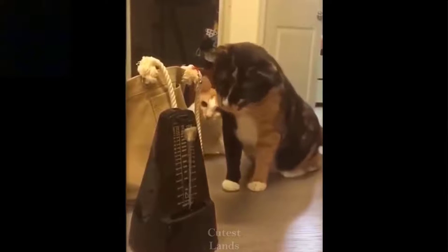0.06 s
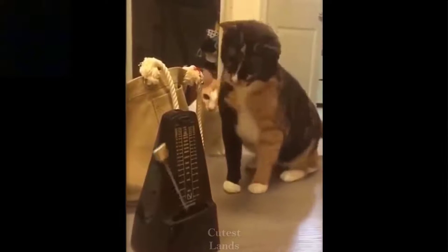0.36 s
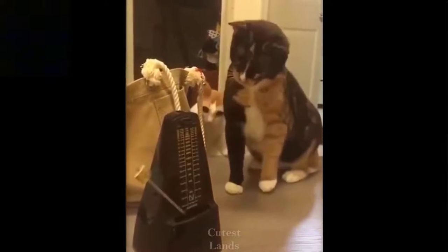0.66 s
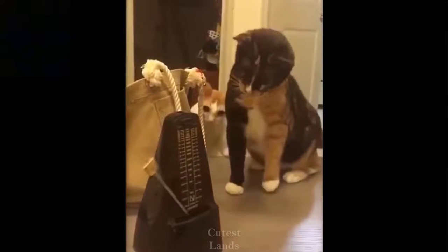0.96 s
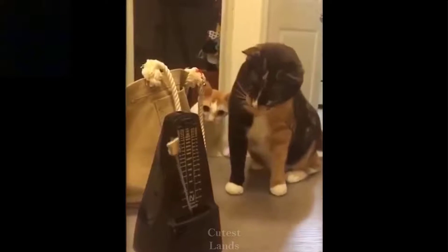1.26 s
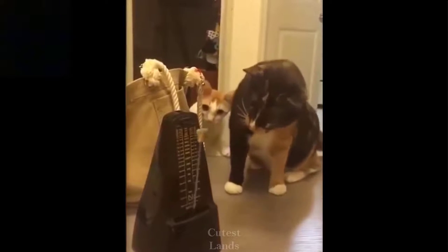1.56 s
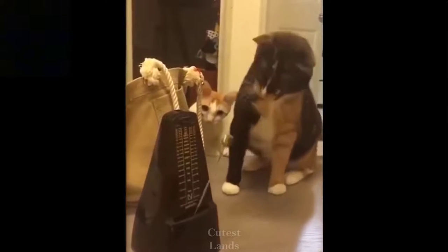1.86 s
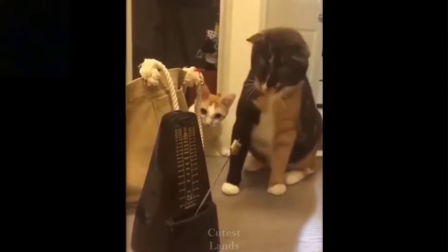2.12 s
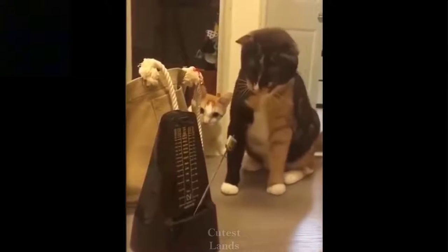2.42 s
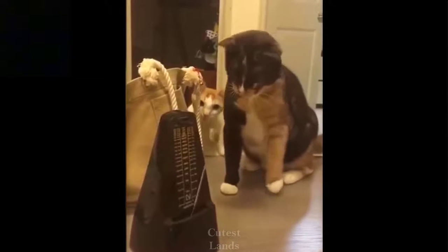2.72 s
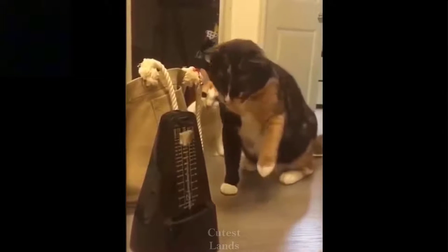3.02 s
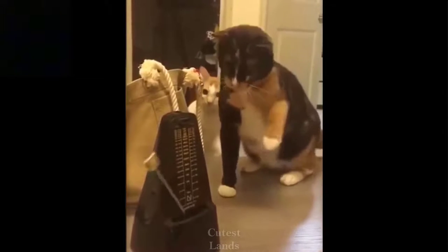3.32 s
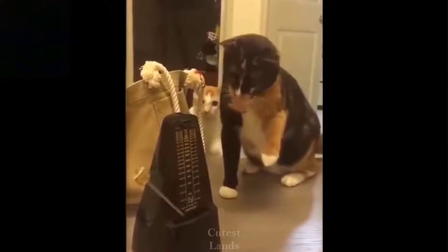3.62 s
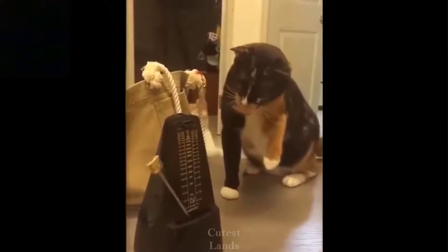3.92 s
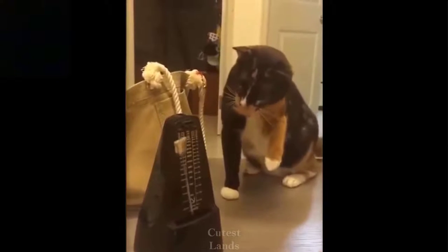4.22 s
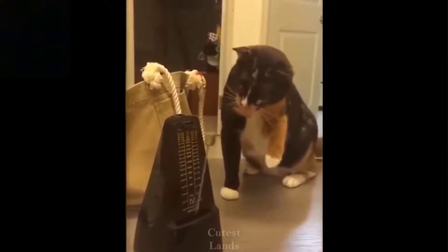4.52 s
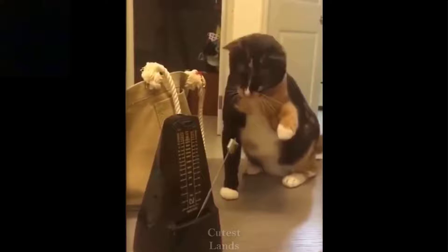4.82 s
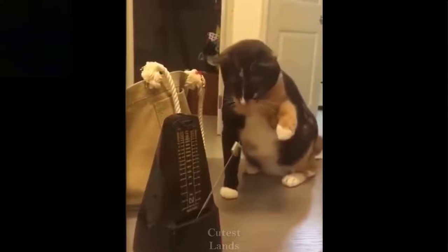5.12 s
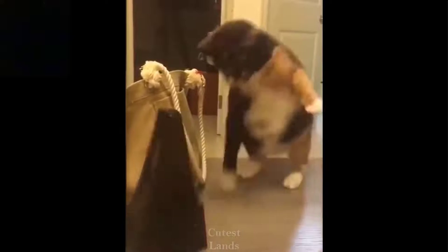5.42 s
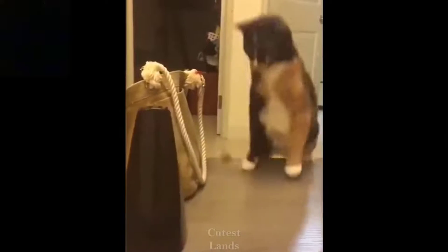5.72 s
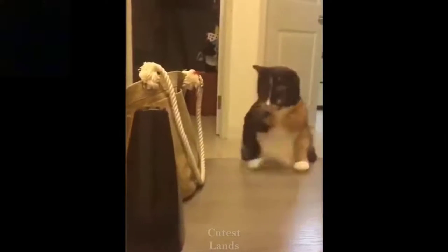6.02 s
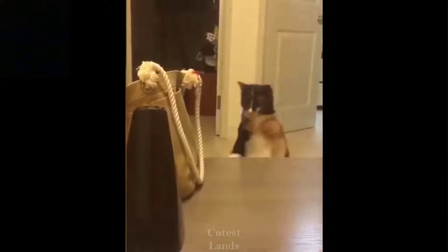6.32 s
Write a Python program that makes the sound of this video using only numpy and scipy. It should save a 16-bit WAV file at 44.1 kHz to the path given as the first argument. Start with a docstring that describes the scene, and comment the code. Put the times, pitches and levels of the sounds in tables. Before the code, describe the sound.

A low, steady ventilation hum with a soft rush of air fills a room throughout. Close by on a table, a wind-up metronome ticks slowly and evenly at about 0.5, 2.0, 3.4 and 4.9 seconds. Each beat is a dry plastic clack with a faint steel ring and a short room reverberation. Two very faint scuffs come near 0.8 and 1.4 seconds. At 5.6 seconds a cat swats the rod, making a sharp metallic clang. The case immediately scrapes and rocks, thumping the table top rapidly and rattling its loose parts until about 5.8 seconds. Another tick sounds at 5.9 seconds, followed by a second short scrape and cluster of thumps around 6.0 seconds, then a lighter scrape and rattle near 6.2. One last firm tick lands at 6.3 seconds, less metallic now that the case has turned away.

```python
"""On a table in a room humming with ventilation, a wind-up metronome ticks slowly, close by.
Each beat of the escapement is an impact that excites the damped modes of the plastic case and steel works.
A cat swats the rod: the case rocks, thumping the table top and rattling its loose parts, and scrapes round
by stick-slip friction. The last two beats sound from its back, which shields the steel.
Early reflections and a short diffuse reverberation follow the impacts."""
import sys
import numpy as np
from scipy import signal
from scipy.fft import rfft, irfft
from scipy.io import wavfile
from scipy.ndimage import uniform_filter1d, minimum_filter1d

SR = 44100
rng = np.random.default_rng(int(sys.argv[2]) if len(sys.argv) > 2 else 0)


def file_out(sig):
    """Save sig as 16-bit WAV at sys.argv[1]."""
    # one column per channel
    cols = np.atleast_2d(sig).T
    # limit, then scale
    lim = np.clip(cols, -1, 1)
    pcm = np.round(lim * 32767).astype(np.int16)
    wavfile.write(sys.argv[1], SR, pcm)


N = 289296
RING_T = np.arange(SR // 3) / SR  # time axis of one impact, t/s

# rush of the ventilation: (f/Hz, relative spectral level/dB)
AIR_SPECTRUM = [(15, -30.5), (50, -9), (88, -0.5), (108, -11.5), (160, -14), (215, -8), (335, -11),
                (390, -20), (560, -17.5), (760, -27), (1060, -30.5), (1270, -37.5), (1550, -39),
                (1950, -39.5), (2300, -43.5), (2600, -42), (3000, -45.5), (4000, -48.5), (5000, -50),
                (9500, -60.5)]
# hum bands of the ventilation: (f/Hz, width/Hz, rms level/dB)
HUM_BANDS = [(73.6, 15, -46.5), (132.7, 11, -47), (192.3, 9, -39), (257.6, 17, -47.5)]
# first reflections from the table and walls: (delay/s, level/dB)
EARLY_ECHOES = [(.0054, -19.5), (.0102, -29), (.0145, -21), (.017, -13.5), (.0305, -27.5)]
# reverberation time of the room: (f/Hz, T60/s)
REVERB_TIMES = [(200, 0.49), (660, 0.27), (2200, 0.4), (4600, 0.33), (9000, 0.29)]
# colour of the reverberation: (f/Hz, level/dB)
REVERB_SPECTRUM = [(200, 3), (660, -2), (1200, 3), (2500, -4), (4600, -2.5), (8500, 1.5)]
# response of the small microphone: (f/Hz, gain/dB)
MIC_RESPONSE = [(1150, -1), (1480, -1.5), (1900, 3.5), (4400, -0.5), (5000, -4), (5800, 0)]
# faint scuffs between the beats: (t/s, level/dB)
FAINT_SCUFFS = [(0.76, -52.5), (1.42, -59.5)]
# shoves that slide base and paws over the table: (t/s, rise/s, length/s, level/dB, tilt/(dB/octave))
SLIDES = [(5.561, 0.014, 0.23, -29.5, -1), (5.867, .009, 0.11, -38.5, 0), (5.958, .045, 0.079, -33.5, -1.5),
          (6.188, 0.012, 0.11, -36, -5)]
# loose plastic rattling and rubbing in the hollow case: (f/Hz, relative spectral level/dB)
RATTLE_SPECTRUM = [(150, -10), (400, 3.5), (780, 6.5), (1050, -1.5), (1280, -0.5), (1480, -9.5), (1800, -2),
                   (2030, -0.5), (2300, -1.5), (2600, -3.5), (3000, -5.5), (3300, 2), (3750, -16.5),
                   (4100, 0.5), (4400, -9), (4700, -3), (5000, -7), (6500, -13), (8400, -15), (10000, -52)]
# modes of the table top: (f/Hz, T60/s, level/dB)
TABLE_MODES = [(189, 0.34, -4), (245.3, 0.16, 3), (267, 0.13, -5), (327.6, 0.11, 0.5), (359.8, 0.11, 4),
               (416.8, 0.063, 6), (459.4, 0.11, -2), (565, 0.042, 4.5)]
# the base lands on one edge after another:
# (t/s, thump level/dB, edge f/Hz, rattle level/dB, tilt/(dB/octave), clink f/Hz, clink level/dB)
LANDINGS = [(5.6362, -7, 424, -15.5, 1.5, 1970, -12), (5.649, -10.5, 255, -22.5, 1.5, 2000, -19),
            (5.659, -11, 204, -36.5, 5, 2150, -27.5), (5.6659, -25.5, 330, -20.5, -1, 2450, -22),
            (5.689, -5, 287, -18, 1.5, 1880, -29), (5.7041, -16.5, 280, -16.5, -1.5, 1920, -20.5),
            (5.724, -12.5, 363, -21, 0, 2260, -18), (5.7556, -11, 338, -33, -5, 2060, -23),
            (5.78, -18, 349, -30, -7, 2100, -36), (5.7892, -16, 360, -29, 1, 2280, -26),
            (5.877, -39, 330, -19.5, 0.5, 1850, -26.5), (5.964, -27, 398, -28, 0.5, 2680, -24),
            (5.9881, -24.5, 400, -31, -9, 2420, -26), (5.998, -22.5, 336, -24.5, -2, 2200, -29),
            (6.005, -8, 355, -15.5, 0, 2700, -25), (6.026, -12, 440, -23, -1.5, 2030, -26),
            (6.045, -23, 235, -37, 5, 2120, -37), (6.2055, -47, 455, -30, -7.5, 1960, -35),
            (6.2365, -34, 484, -25.5, -5, 1960, -29.5), (6.2841, -26.5, 287, -45, 2, 1850, -32)]
# the swatted rod chatters against the case: (t/s, rod level/dB, case level/dB, rattle level/dB)
ROD_STRIKES = [(5.5695, -35, -7, -14), (5.5763, -4.5, -20, -18), (5.607, -19, -30, -19.5)]
# broad modes of the plastic case: (f/Hz, T60/s, front level/dB, back level/dB)
CASE_MODES = [(321.2, 0.14, -18.5, -22.5), (675, 0.019, 1.5, -6.5), (807, 0.041, -47, -8),
              (1049, 0.019, -13, -13), (1220, 0.024, -24, -23), (1620, .012, -19.5, -24),
              (1763, 0.032, -13.5, -18), (2046, 0.021, -13, -18), (2480, 0.0096, -1.5, -10),
              (2744, 0.011, -36.5, -11.5), (3227, 0.017, -9.5, -15.5), (3477, 0.021, -13, -32),
              (3956, 0.012, -19, -16), (4690, 0.0085, -10, -27), (5460, 0.0065, -22, -17),
              (7620, 0.005, -18.5, -36), (8470, 0.012, -26.5, -39.5)]
# modes of the steel rod and clockwork: (f/Hz, T60/s, beat level/dB, swatted level/dB, shaken level/dB)
STEEL_MODES = [(1300, .09, -39, -19, -20), (1764, .2, -27, -40.5, -17), (1980, .21, -29, -29, -10),
               (2057, .12, -28, -27, -13), (2126, .12, -29, -28, -16), (2172, .09, -30.5, -18.5, -11),
               (2428, .13, -31, -32, -17), (2471, .14, -23, -23, -15), (2610, .16, -25, -32, -21),
               (2805, .13, -28.5, -30, -17), (3160, .12, -30, -30, -18), (3298, .12, -27.5, -7.5, -16),
               (3436, .11, -25, -12.5, -21), (3480, .08, -23, -30, -22), (3975, .03, -33, -9, -18),
               (4100, .05, -24, -13, -13), (4570, .044, -31, -7, -18), (4738, .11, -27, -11, -17),
               (5360, .06, -38, -19, -25), (6735, .12, -47, -34, -30), (7610, .04, -39.5, -19, -29),
               (8385, .06, -37.5, -21, -27)]
# the crowd of small modes in the case: (f/Hz, relative spectral level/dB)
CLACK_SPECTRUM = [(200, -10), (600, -1), (950, 7), (1400, 4), (2300, -1), (3300, -20), (3800, -1.5),
                  (6000, -4.5), (8300, -7), (8900, -10), (10000, -40)]
# a beat as radiated into the room, averaged over all directions: (f/Hz, relative spectral level/dB)
RADIATED_SPECTRUM = [(200, -8), (420, -18), (650, -7), (950, 6.5), (1400, -9.5), (1950, -5.5), (2550, 2),
                     (3350, -4.5), (3700, -2.5), (4600, -5), (5600, -13), (8100, -26), (10000, -28)]
# escapement beats: (t/s, level/dB, tilt/(dB/octave), midrange bite/dB, case turned away 0-1)
BEATS = [(0.5054, -2, 0, 1.5, 0.1), (2.006, 0, 1.5, -3.5, 0.11), (3.4198, 0, 1, 0.5, 0.27),
         (4.9008, 0, 1, -0.5, 0.13), (5.8663, -3.5, -0.5, -2, 0.92), (6.3328, 1, -0.5, 2, 1)]


def amp(db):
    """Amplitude ratio: a factor of ten for every 20 dB."""
    return 10 ** (np.asarray(db) / 20)


def unit_rms(x):
    """Normalisation to unit mean power."""
    return x / np.sqrt(np.mean(x ** 2) + 1e-20)


def curve_at(points, hz):
    """Interpolation on a logarithmic frequency axis."""
    f, value = np.transpose(points)
    return np.interp(np.log(hz + 1), np.log(f + 1), value)


def add(mix, start_s, sound):
    """Superposition: a sound adds linearly to the mix from its onset."""
    part = mix[round(start_s * SR):][:len(sound)]
    part += sound[:len(part)]


def coloured(x, spectrum):
    """Linear filtering by a spectral envelope, scaled to unit rms."""
    gain = amp(curve_at(spectrum, np.fft.rfftfreq(len(x), 1 / SR)))
    return unit_rms(irfft(rfft(x) * gain, len(x)))


def tilted(spectrum, tilt):
    """Spectral slope: a tilt in dB per octave brightens or dulls a sound."""
    return [(f, level + tilt * np.log2(f)) for f, level in spectrum]


def blow_colour(hz, tilt, bite_db, centre_hz=2040, width_octaves=1):
    """Excitation spectrum of one blow, in dB: a slope and a midrange hump."""
    octaves = np.log2(hz / centre_hz)
    return tilt * octaves + bite_db * np.exp(-(octaves / width_octaves) ** 2)


def ring(hz, t60, db, rise_cycles, lag):
    """Damped modes with dispersion: bending waves bring the treble first (lag: travel time/s at 1 kHz)."""
    hz, t60, db = hz[:, None], t60[:, None], db[:, None]
    delay = lag * np.sqrt(1000 / hz)
    t = np.maximum(RING_T - delay + delay.min(), 0)
    envelope = amp(db - 60 * t / t60) * (1 - np.exp(-t * hz / rise_cycles))
    return (envelope * np.sin(2 * np.pi * hz * t)).sum(0)


def burst(spectrum, t60, rise_s=0.00054):
    """Modal overlap: countless small modes merge into a dying noise with a smooth spectrum."""
    envelope = amp(-60 * RING_T / t60) * (1 - np.exp(-RING_T / rise_s))
    phase = np.angle(rfft(rng.standard_normal(len(RING_T)) * envelope))
    flat = irfft(np.exp(1j * phase), len(RING_T))  # the phase alone carries the decay
    smooth = coloured(flat, spectrum) * np.sqrt(np.mean(envelope ** 2))
    return smooth * signal.windows.tukey(len(RING_T), .004) * (1 - RING_T / RING_T[-1])


def diffused(response):
    """Spectral smoothing: narrow peaks that would ring are levelled, and the broad colour stays."""
    z = rfft(response, 2 * len(response))
    power = abs(z) ** 2
    z = z * np.sqrt(uniform_filter1d(power, size=400) / uniform_filter1d(power, size=30))
    return irfft(z)[:len(response)]


def ventilation(rush_db=-37):
    """Broadband flow noise, with narrow noise bands whose random beating makes the hum waver."""
    hz = np.fft.rfftfreq(N, 1 / SR)
    out = amp(rush_db) * coloured(rng.standard_normal(N), AIR_SPECTRUM)
    for centre, width, db in HUM_BANDS:
        band = rfft(rng.standard_normal(N)) / (1 + 2 * ((hz - centre) / width) ** 2)
        out += amp(db) * unit_rms(irfft(band, N))
    return out


def reverberation(x, build_up_s=0.0058):
    """A diffuse field builds up, then decays exponentially at its own rate in each band."""
    size = SR // 2
    hz, t, z = signal.stft(rng.choice([-1., 1.], size), SR, nperseg=256)
    t60 = curve_at(REVERB_TIMES, hz)[:, None]
    unit_energy = np.sqrt(2 * np.log(1000) / (t60 * SR))
    z = z * unit_energy * amp(curve_at(REVERB_SPECTRUM, hz)[:, None] - 60 * t / t60)
    response = signal.istft(z, SR, nperseg=256)[1][:size]
    onset = np.clip(np.arange(size) / SR / build_up_s, 0, 1) ** .5
    return signal.fftconvolve(x, onset * diffused(onset * response))[:N]


def reflections(x):
    """Specular reflection: the table and walls return delayed, weaker copies."""
    out = np.zeros(N)
    for delay, db in EARLY_ECHOES:
        add(out, delay, amp(db) * x)
    return out


def shove(rise, length, sag_db_per_s=-12.5, stop_db_per_s=-200):
    """Frictional braking: the envelope of a slide that grips, slows down, then stops."""
    t = np.arange(SR) / SR
    return np.minimum(t / rise, 1) * amp(sag_db_per_s * t + stop_db_per_s * np.maximum(t - length, 0))


def sliding(slips_per_s=1400, spread_db=1.0):
    """Stick-slip friction: a dense train of tiny, uneven slips under each shove, and two light scuffs."""
    out = np.zeros(N)
    for s, rise, length, db, tilt in SLIDES:
        slips = (rng.random(SR) < slips_per_s / SR) * rng.choice([-1, 1], SR)
        sizes = amp(spread_db * np.minimum(rng.exponential(1, SR), 4))
        scrape = coloured(slips * sizes, tilted(RATTLE_SPECTRUM, tilt))
        add(out, s, amp(db) * shove(rise, length) * scrape)
    for s, db in FAINT_SCUFFS:
        add(out, s, amp(db) * burst([(500, -12), (2500, 5), (7000, 3.0), (10000, -8)], t60=0.13))
    return out


def rocking(width_octaves=0.36, clockwork_db=-12, uneven_db=2, thump_lag_s=0.0014, clink_t60=0.03):
    """Impact excitation: each landing drives the table modes near its pitch and shakes case and works."""
    rattles, rings = np.zeros((2, N))
    hz, t60, db = np.transpose(TABLE_MODES)
    steel_hz, steel_t60, _, _, shaken = np.transpose(STEEL_MODES)
    for s, thump_db, edge_hz, rattle_db, tilt, clink_hz, clink_db in LANDINGS:
        levels = thump_db + db - 6 * (np.log2(hz / edge_hz) / width_octaves) ** 2
        thump = ring(hz, t60, levels, rise_cycles=1.0, lag=0.00067)
        add(rings, s + thump_lag_s, thump)  # the table top gives way just after the click
        jangle_db = rattle_db + clockwork_db + shaken + blow_colour(steel_hz, tilt, 0)
        jangle_db += uneven_db * rng.standard_normal(len(shaken))
        add(rings, s, ring(steel_hz, steel_t60, jangle_db, rise_cycles=1.5, lag=0.00088))
        loose_part = np.transpose([(clink_hz, clink_t60, clink_db)])
        add(rings, s, ring(*loose_part, rise_cycles=2.6, lag=0))
        add(rattles, s, amp(rattle_db) * burst(tilted(RATTLE_SPECTRUM, tilt), t60=0.041))
    return rattles, rings


def swat():
    """Collision: the paw drives the rod into the case, and each rings in its own modes."""
    case, steel = np.zeros((2, N))
    steel_hz, steel_t60, _, swatted, _ = np.transpose(STEEL_MODES)
    clang = ring(steel_hz, steel_t60, swatted, rise_cycles=1.6, lag=0.00084)
    hz, t60, _, back = np.transpose(CASE_MODES)
    knock = ring(hz, t60, back, rise_cycles=1.0, lag=0.0013)
    for s, rod_db, case_db, rattle_db in ROD_STRIKES:
        add(case, s, amp(case_db) * knock + amp(rattle_db) * burst(RATTLE_SPECTRUM, t60=0.077))
        add(steel, s, amp(rod_db) * clang)
    return case, steel


def metronome(clack_db=-22, gears_db=-25, shield_db=-9, uneven_db=1,
              radiated_db=-13, turned_db=-2.5, turned_tilt=-0.3):
    """Directivity: each beat rings case and steel, and the back favours other modes than the open front."""
    case, steel, radiated = np.zeros((3, N))
    hz, t60, front, back = np.transpose(CASE_MODES)
    steel_hz, steel_t60, on_beat, _, _ = np.transpose(STEEL_MODES)
    clack = amp(clack_db) * burst(CLACK_SPECTRUM, t60=0.022)  # the case answers every beat alike
    for s, db, tilt, bite_db, turned in BEATS:
        levels = (1 - turned) * front + turned * back + blow_colour(hz, tilt, bite_db)
        knock = ring(hz, t60, levels, rise_cycles=1.6, lag=0.00154)
        gears = amp(gears_db + 2 * tilt) * burst(CLACK_SPECTRUM, t60=0.07)  # loose gears shake anew
        add(case, s, amp(db) * (knock + clack + gears))
        ping_db = on_beat + turned * shield_db + blow_colour(steel_hz, tilt, bite_db)
        ping_db += uneven_db * rng.standard_normal(len(ping_db))  # no two teeth strike quite alike
        add(steel, s, amp(db) * ring(steel_hz, steel_t60, ping_db, rise_cycles=0.83, lag=0.00086))
        room_tilt = tilt + turned * turned_tilt
        spectrum = [(f, level + blow_colour(f, room_tilt, bite_db)) for f, level in RADIATED_SPECTRUM]
        room_db = db + radiated_db + turned * turned_db + bite_db / 2
        add(radiated, s, amp(room_db) * burst(spectrum, t60=0.029))
    return case, steel, radiated


def scene(ring_room_db=-10, clack_room_db=-4, beat_room_db=-5):
    """Direct and reverberant fields: clacks fill the room; steel and table top are heard mostly direct."""
    beats, pings, radiated = metronome()
    swat_clacks, clangs = swat()
    rattles, rocking_rings = rocking()
    clacks = swat_clacks + rattles + sliding()
    rings = clangs + rocking_rings + pings
    into_room = radiated + amp(beat_room_db) * beats + amp(clack_room_db) * clacks
    tail = reverberation(into_room + amp(ring_room_db) * rings)
    return (beats + clacks + rings + reflections(beats + clacks) + tail + ventilation())[None]


def record(dry, ceiling=0.58, cutoff_hz=9700):
    """Transduction: the microphone colours the sound, then come a fast peak limiter and a low-pass."""
    response = amp(curve_at(MIC_RESPONSE, np.fft.rfftfreq(2 * N, 1 / SR)))
    heard = irfft(rfft(dry[0], 2 * N) * response)[:N]
    gain = np.minimum(1, ceiling / (abs(heard) + 1e-9))
    gain = uniform_filter1d(minimum_filter1d(gain, size=45), size=45)  # held and smoothed over 1 ms
    low_pass = signal.butter(24, cutoff_hz, fs=SR, output="sos")
    return signal.sosfilt(low_pass, heard * gain)[None]


dry = scene()
out = record(dry)
file_out(out)
```